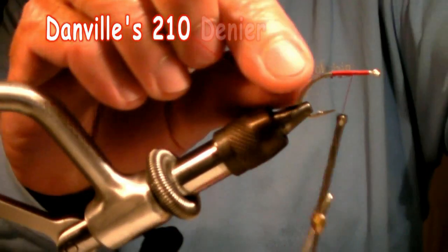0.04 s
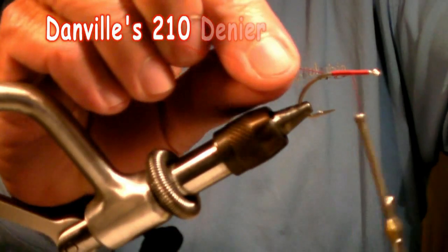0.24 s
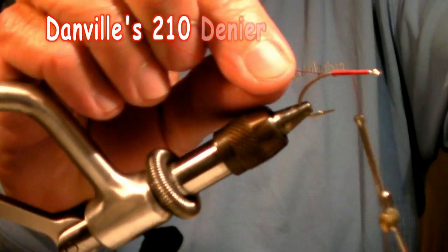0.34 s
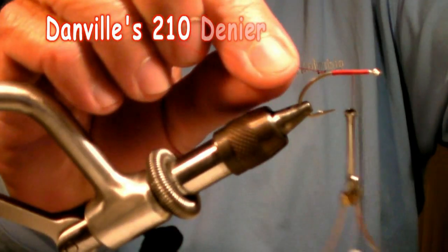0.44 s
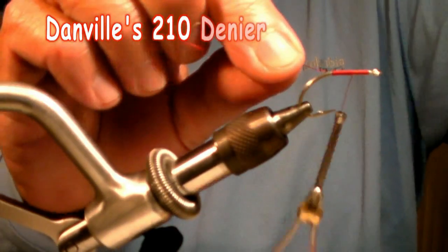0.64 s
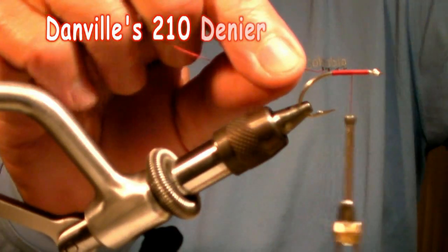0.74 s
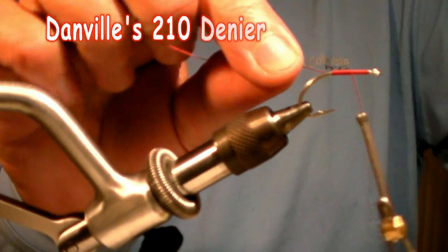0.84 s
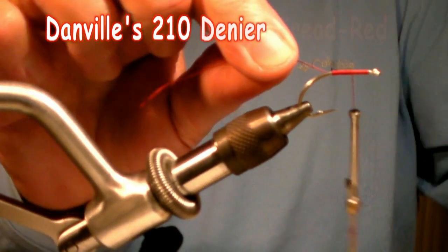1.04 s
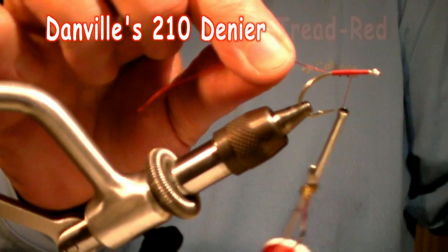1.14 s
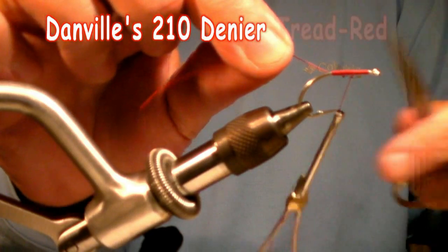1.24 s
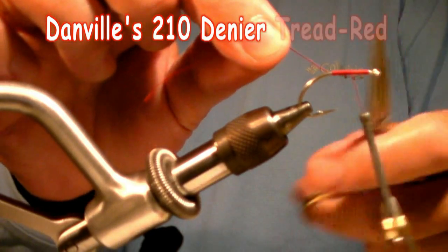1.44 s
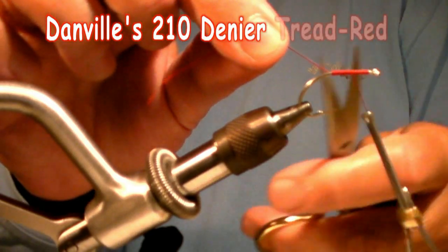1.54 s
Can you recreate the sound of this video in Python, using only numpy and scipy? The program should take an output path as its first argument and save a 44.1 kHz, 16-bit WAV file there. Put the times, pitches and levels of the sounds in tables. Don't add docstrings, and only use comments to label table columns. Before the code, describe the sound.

Scissors clatter on a wooden bench: gritty sliding and light taps, two dense bursts of hard knocks, then soft finger ticks and rustle. Close small stereo microphone, short room reverberation, faint fan hum and hiss.

```python
import sys
import numpy as np
from scipy import signal
from scipy.io import wavfile

SR = 44100
rng = np.random.default_rng(int(sys.argv[2]) if len(sys.argv) > 2 else 0)


def wav_record(signal):
    frames = np.transpose(np.atleast_2d(signal))
    bounded = np.clip(frames, -1, 1)
    quanta = np.round(bounded * 32767).astype(np.int16)
    wavfile.write(sys.argv[1], SR, quanta)


def linear_from_db(decibels):
    return 10 ** (np.asarray(decibels, float) / 20)


N = 70560

# f/Hz, level/dB, t60/s
BENCH_FREE = [(404.7, -10, 0.28), (452, 3.5, 0.042), (556, -6, 0.018), (770, 0, 0.067), (1036, 3, 0.017),
              (1268, 0.5, 0.02), (1530, -7, 0.042), (1910, -2, 0.024), (2233, -3, .04), (2345, -12, 0.063),
              (2530, -26, 0.02), (2900, -6.5, 0.024), (3240, -21, .025)]
# f/Hz, level/dB, t60/s
BENCH_HELD = [(330, -1.5, 0.026), (455, 3.5, 0.03), (620, -4, 0.018), (1036, -1.5, 0.026),
              (1218, -0.5, 0.019), (1470, -15.5, 0.053), (1817, -5.5, 0.061), (2040, 1, .025),
              (2305, 0, 0.024), (2590, -11, 0.017), (2850, -4, .02), (3320, -7.5, 0.065),
              (3540, -5.5, .035)]
# f/Hz, level/dB, t60/s
BENCH_SLID = [(408, -4.5, 0.089), (499, -4.5, 0.076), (582, -7, 0.12), (828, -12.5, 0.18),
              (1145, -6.5, .04), (1222, -6, 0.037), (1384, -6, .04), (1820, 1, 0.02), (2103, -5.5, .04),
              (2380, -8, 0.023), (2670, -5.5, 0.041), (2900, -18, 0.02), (3300, -1, 0.022)]
LIFT_S, DROP_S = 0.18, 0.3


def evened(x):
    return x / np.sqrt(np.mean(x ** 2) + 1e-20)


def read(points, hz):
    f, value = np.transpose(points)
    return np.interp(np.log(hz + 1), np.log(f + 1), value)


def add(mix, s, sound):
    part = mix[..., max(round(s * SR), 0):][..., :sound.shape[-1]]
    part += sound[..., :part.shape[-1]]


def ring(modes, colour_db):
    hz, db, t60 = np.transpose(modes)[:, :, None]
    t = np.arange(12000) / SR
    decay = linear_from_db(db + colour_db[:, None] - 60 * t / t60)
    return (decay * np.sin(2 * np.pi * hz * t)).sum(0)


def noise(shape_db, same):
    a, b, c, d = rng.standard_normal((N // 512 + 5, 1025, 4)).T
    same = np.clip(same, 0, 1)[:, None]
    left = a + 1j * b
    right = same * left + np.sqrt(1 - same ** 2) * (c + 1j * d)
    spectrum = np.array([left, right]) * linear_from_db(shape_db)[:, None]
    return evened(signal.istft(spectrum, nperseg=2048, noverlap=1536)[1][:, :N])


def background():
    # f/Hz, level/dB per Hz
    air = [(15, -57), (25, -58), (49, -8.5), (124, -3.5), (282, -14), (305, -14.5), (390, 0), (440, -5),
           (1000, -37), (1300, -45), (2200, -120)]
    # f/Hz, level/dB per Hz
    hiss = [(410, -94), (700, 1), (933, -4), (1130, -2), (1960, -6), (8900, -6.5), (15800, -6.5)]
    # f/Hz, likeness/1
    likeness = [(60, 0.84), (180, 0.9), (550, 0.84), (1650, 0.61), (4970, 0.35), (15000, -0.59)]
    # f/Hz, level/dB rms, bandwidth/Hz
    hum = [
        (59.2, -65, 2),
        (118.4, -65, 6),
        (321, -70, 6),
        (393, -60.5, 3),
        (462, -71, 6),
    ]
    air_db, hiss_db = -57.5, -58
    hz, t = np.fft.rfftfreq(2048, 1 / SR), np.arange(N) / SR
    same = read(likeness, hz)
    air_tilt = -30 * np.log2(np.maximum(hz / 1000, 1))
    hiss_tilt = 12 * np.log2(np.clip(hz / 700, .001, 1))
    out = linear_from_db(air_db) * noise(read(air, hz) + air_tilt, same)
    out += linear_from_db(hiss_db) * noise(read(hiss, hz) + hiss_tilt, same)
    for f, db, width in hum:
        r = np.exp(-np.pi * width / SR)
        drift = signal.lfilter([1], [1, -r], rng.standard_normal((N + SR, 2)) @ [1, 1j])[SR:]
        phasor = drift / np.std(drift) + 1.6
        out += linear_from_db(db) * evened((phasor * np.exp(2j * np.pi * f * t)).real)
    return out


def rustle():
    # centre t/s, length/s, level/dB, low edge f/Hz
    swells = [(.0, 0.05, -45.5, 1450), (0.066, 0.038, -47, 4760), (0.241, 0.034, -36, 4150),
              (0.314, 0.031, -42.5, 5770), (0.46, 0.037, -56.5, 5200), (0.612, 0.031, -53, 7400),
              (0.728, 0.025, -60.5, 5100), (0.812, 0.016, -60.5, 3880), (0.999, 0.034, -51.5, 8700),
              (1.023, 0.052, -55.5, 980), (1.074, 0.0049, -52, 2000), (1.14, 0.064, -60, 1010),
              (1.281, 0.037, -55.5, 720), (1.37, 0.12, -66, 2020), (1.508, 0.037, -49, 6700)]
    out, t = np.zeros((2, N)), np.arange(N) / SR
    grain = rng.standard_normal((3, N))
    for s, length, db, hz in swells:
        sos = signal.butter(2, np.clip(hz, 100, 12000), "high", fs=SR, output="sos")
        pole = np.clip(.9 - hz / 12000, 0, .9)
        soft = signal.lfilter([1], [1, -pole], grain[:2] + 0.42 * grain[2])
        swell = np.exp(-.5 * ((t - s) / (0.42 * length)) ** 2)
        out += linear_from_db(db) * swell * evened(signal.sosfilt(sos, soft))
    return out


def fingers():
    # t/s, level/dB, f/Hz, t60/s
    ticks = [(0.00395, -43, 1780, 0.17), (.124, -34.5, 1868, 0.016), (.026, -35.5, 1080, 0.036),
             (.316, -24, 11800, 0.066), (.332, -37, 2900, 0.0081), (.284, -44, 2250, 0.12),
             (1.2, -61.5, 730, .25), (1.012, -53.5, 1008, 0.18), (1.018, -48.5, 2200, 0.035),
             (1.073, -42.5, 2550, 0.014), (1.0735, -42, 3500, 0.008), (1.106, -47, 1240, 0.013),
             (1.135, -49, 1380, 0.031), (1.254, -52, 1720, 0.072), (1.276, -50, 1780, 0.051),
             (1.273, -56, 1130, 0.045), (1.278, -50, 2550, .04), (1.491, -54, 3660, 0.11),
             (1.503, -44, 3590, 0.031), (1.504, -38, 7870, 0.017), (1.518, -57, 11900, .03),
             (1.492, -49, 9100, 0.066), (1.27, -48, 8200, .06), (1.501, -50, 1700, 0.04),
             (1.519, -51, 3480, 0.04)]
    out, t = np.zeros(N), np.arange(4000) / SR
    for s, db, hz, t60 in ticks:
        overtone = 0.2 * np.sin(2 * np.pi * 2.3 * hz * t) * linear_from_db(-60 * t / t60)
        tone = np.sin(2 * np.pi * hz * t) + overtone
        add(out, s, linear_from_db(db - 60 * t / t60) * np.minimum(t / 0.00078, 1) * tone)
    return out


def drag():
    # t/s, pressure level/dB
    pressure = [(0, -44), (.056, -52), (.058, -33), (.085, -41), (.088, -34), (.138, -41), (.148, -54),
                (.2, -54), (.212, -47), (.226, -35), (.245, -28), (.265, -42), (.3, -46), (.3125, -39),
                (.318, -30), (.345, -39), (.385, -42), (.56, -72)]
    grit_per_s, grit_spread_db, grit_steel_db = 7200, -0.5, -14.5
    s, db = np.transpose(pressure)
    t = np.arange(N) / SR
    size = linear_from_db(grit_spread_db * np.minimum(rng.exponential(1, (2, N)), 3))
    grit = size * rng.standard_normal((2, N)) * (rng.random((2, N)) < grit_per_s / SR)
    sliding, released = t < LIFT_S, t >= DROP_S
    rub = np.zeros(N)
    for modes, during in ((BENCH_SLID, sliding), (BENCH_HELD, ~sliding & ~released), (BENCH_FREE, released)):
        shortened = np.array(modes) * [1, 1, .6]
        damped = signal.lfilter([1, -.7], [1], ring(shortened, np.zeros(len(modes))))
        rub += during * evened(signal.oaconvolve(grit[0], damped)[:N])
    level = linear_from_db(np.interp(t, s, db, right=-120))
    blades_touch = np.clip((.39 - t) / 0.031, 0, 1)
    return rub * level, linear_from_db(grit_steel_db) * evened(grit) * level * blades_touch


def slaps():
    # t/s, level/dB, f/Hz
    swings = [
        (.0903, -30, 650),
        (.3171, -8, 760),
        (.3540, -14, 680),
        (.3722, -21, 600),
    ]
    width_s = .0007
    out, t = np.zeros(N), np.arange(-4 * width_s, 4 * width_s, 1 / SR)
    for s, db, hz in swings:
        swing = np.exp(-.5 * (t / width_s) ** 2) * np.sin(2 * np.pi * hz * t)
        add(out, s + t[0], -linear_from_db(db) * swing)
    return out


def knocks(bench_high_hz):
    # t/s, level/dB, contact time/ms, steel tick level/dB
    blows = [(.005, -23, 1, -17), (0.0276, -31.5, 0.33, -27), (0.0356, -26, 0.97, -22),
             (0.0569, -28.5, 0.033, -16.5), (0.0603, -30, 0.17, -30), (0.068, -36, .15, -35),
             (0.0882, -34.5, 0.083, -30), (.090, -28, 0.18, -30), (.102, -39, 0.12, -30),
             (.1125, -45, 0.089, -30), (0.125, -46, 0.18, -30), (0.21, -40, 0.11, -18),
             (.2255, -24, 0.11, -25), (0.2328, -20, 0.14, -24), (0.2396, -14.5, 0.054, -10.5),
             (0.2415, -14, 0.19, -24), (0.2436, -9.5, 0.25, -11.5), (0.2457, -11.5, 0.073, -23),
             (0.2486, -12, 0.21, -30), (0.262, -39, 0.25, -30), (0.2697, -22, 0.37, -34),
             (0.3131, -10, 0.13, -17), (0.3141, -9, 0.083, -17.5), (0.3161, -6.5, 0.22, -25.5),
             (0.3177, -27, 0.071, -22), (.323, -23, 0.1, -14), (0.3269, -21, 0.09, -26),
             (0.332, -33, 0.046, -29), (.350, -24, 0.056, -23), (0.3523, -12.5, 0.29, -33.5),
             (0.3586, -17.5, 0.24, -44), (.369, -22, 0.19, -34), (0.3702, -17, 0.31, -30),
             (.377, -17, 0.44, -38)]
    # f/Hz, level/dB, t60/s
    blades = [(4750, -8, .012), (5250, -2, .015), (7100, -4, .012), (8400, -6, .01), (9600, -6, .01),
              (11000, -5, .01), (12800, -4, .01)]
    # f/Hz, level/dB, t60/s
    frame = [
        (73, -72, 0.072),
        (147, -27.5, 0.17),
    ]
    # f/Hz, level/dB, t60/s
    pushed = [
        (74.6, -3, 0.046),
        (150, -3, 0.12),
        (295, -4, 0.04),
        (390, -7, 0.056),
        (454, 4.5, 0.0084),
    ]
    spot_db = 1.5
    crack_db, crack_s, crack_hz = -0.5, 0.00025, 600
    crunch_db, crunch_s = 7, .0035
    shove_db, shove_s = -35.5, 0.044
    (bench, legs), steel = np.zeros((2, N)), np.zeros((2, N))
    modes_n = len(BENCH_FREE)
    spots = rng.standard_normal((len(blows), modes_n + len(blades) + 2000))
    t = np.arange(1000) / SR
    band = signal.butter(2, [1900, bench_high_hz], "band", fs=SR, output="sos")
    crack = linear_from_db(crack_db) * np.sin(2 * np.pi * crack_hz * t) * np.exp(-t / crack_s)
    frame_blow = np.convolve(np.hanning(150) / 75, ring(frame, np.zeros(2)))
    for (s, db, ms, tick_db), spot in zip(blows, spots):
        push = np.hanning(np.clip(round(ms * SR / 1000 * 2), 4, 80))
        modes = BENCH_SLID if s < LIFT_S else BENCH_HELD if s < DROP_S else BENCH_FREE
        body = linear_from_db(-11.5) * ring(modes, spot_db * spot[:modes_n])
        body[:1000] += crack
        body[:1000] += linear_from_db(crunch_db) * signal.sosfilt(band, spot[-1000:]) * np.exp(-t / crunch_s)
        add(bench, s, linear_from_db(db) * np.convolve(push / push.sum(), body))
        add(legs, s, linear_from_db(db) * frame_blow)
        add(steel, s, linear_from_db(db + tick_db - 3.0) * ring(blades, spot_db * spot[modes_n:-2000])[None])
        add(steel, s, linear_from_db(db + tick_db + 2) * spot[-2000:].reshape(2, -1) * np.exp(-t / 0.0029))
    shove = rng.standard_normal(N) * np.exp(-np.arange(N) / SR / shove_s)
    legs += linear_from_db(shove_db) * signal.oaconvolve(shove, ring(pushed, np.zeros(len(pushed))))[:N] / 20
    return bench, steel, legs


def room(x):
    # f/Hz, t60/s
    decay_times = [(130, 0.52), (400, 0.26), (1000, 0.24), (3000, 0.35), (8000, 0.26)]
    taps = np.zeros((2, SR // 2))
    at = np.arange(200, SR // 2 - 20, 20)
    at = at + rng.integers(0, 20, (2, len(at)))
    np.put_along_axis(taps, at, rng.choice([-1., 1.], at.shape), 1)
    taps[1] = .5 * taps[0] + .85 * taps[1]
    hz, t, z = signal.stft(taps, SR, nperseg=256)
    decay = linear_from_db(-60 * t / read(decay_times, hz)[:, None])
    tail = signal.istft(z * decay, SR, nperseg=256)[1]
    return signal.fftconvolve(x[None], tail / np.linalg.norm(tail[0]), axes=1)[:, :N]


def scene():
    room_db, steel_left_db, bench_left_db = -13, 2.5, -1.3
    bench_low_hz, bench_high_hz = 324, 3600
    bench, steel, legs = knocks(bench_high_hz)
    rub, scrape = drag()
    bench = signal.sosfilt(signal.butter(3, bench_low_hz, "high", fs=SR, output="sos"), bench + rub)
    bench = signal.sosfilt(signal.butter(6, bench_high_hz, fs=SR, output="sos"), bench)
    bench = bench + fingers() + slaps()
    bench = bench + signal.sosfilt(signal.butter(2, 55, "high", fs=SR, output="sos"), legs)
    steel = signal.sosfilt(signal.butter(4, [4300, 14800], "band", fs=SR, output="sos"), steel + scrape)
    direct = bench * linear_from_db([[bench_left_db], [0]]) + steel * linear_from_db([[steel_left_db], [-steel_left_db]])
    return direct + linear_from_db(room_db) * room(bench + steel[0]) + rustle() + background()


def roll_off(x):
    return signal.sosfilt(signal.butter(12, 15830, fs=SR, output="sos"), x)


def record(dry):
    left_lag, edge_hz = -2, 15700
    dry = np.array([np.roll(dry[0], left_lag), dry[1]])
    lowpass = signal.firwin(801, edge_hz, window=("kaiser", 8), fs=SR)
    mix = signal.oaconvolve(dry, lowpass[None], "same")
    return roll_off(mix)


dry = scene()
out = record(dry)
wav_record(out)
```